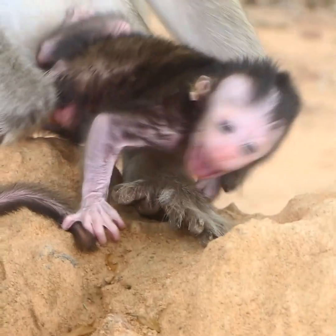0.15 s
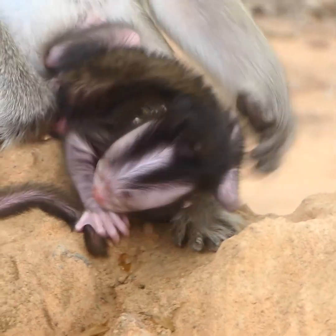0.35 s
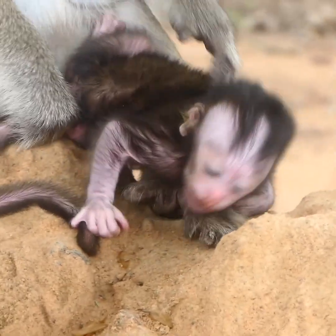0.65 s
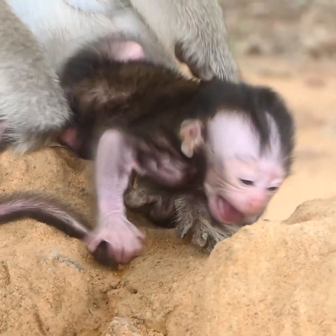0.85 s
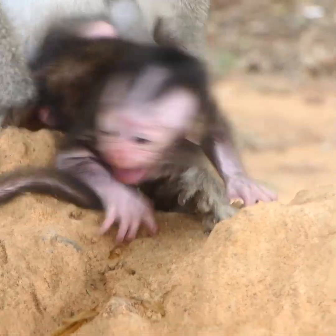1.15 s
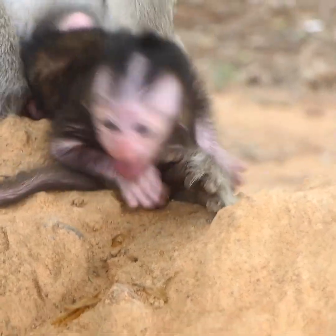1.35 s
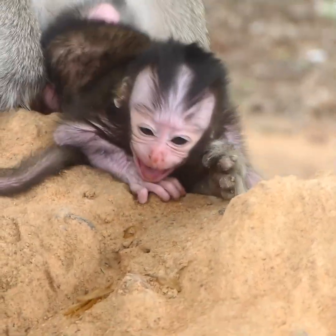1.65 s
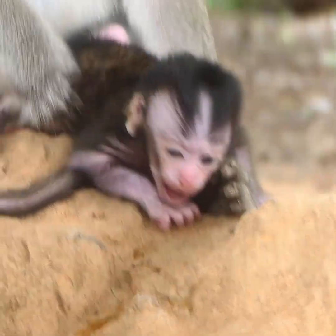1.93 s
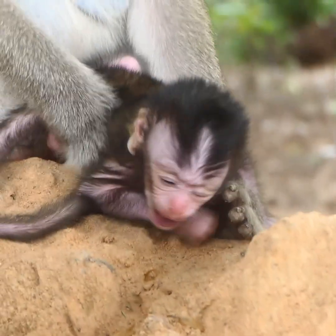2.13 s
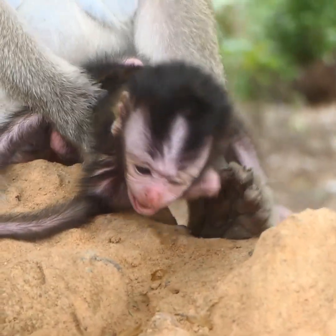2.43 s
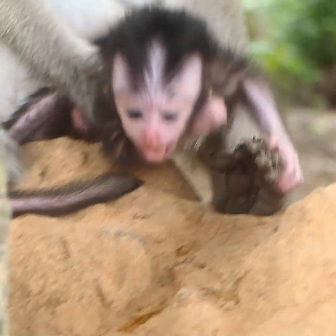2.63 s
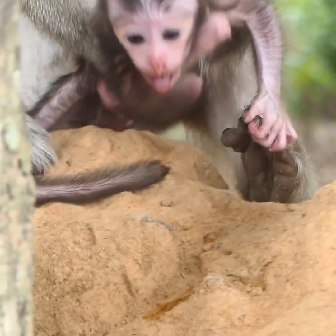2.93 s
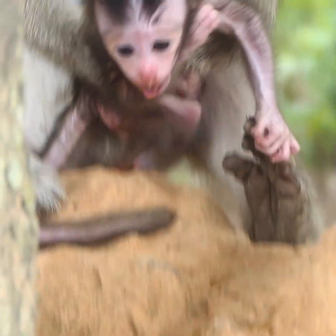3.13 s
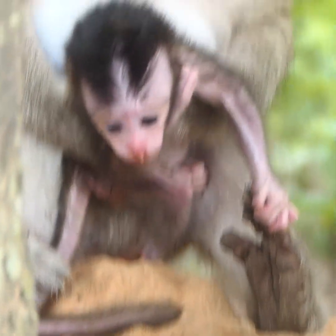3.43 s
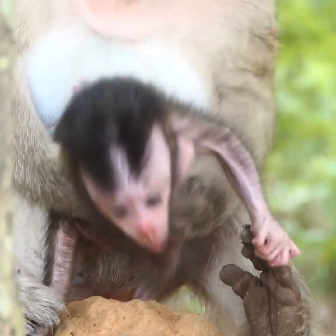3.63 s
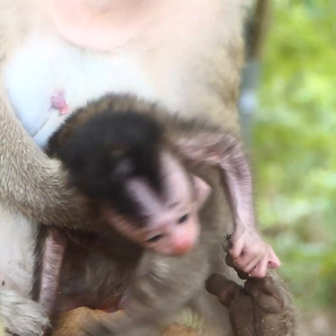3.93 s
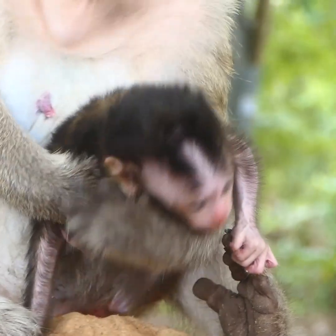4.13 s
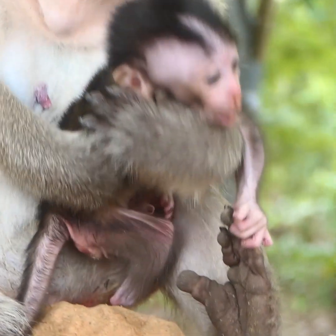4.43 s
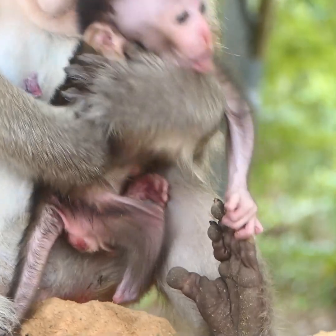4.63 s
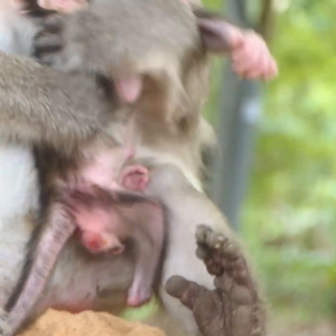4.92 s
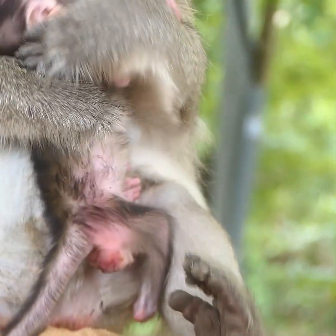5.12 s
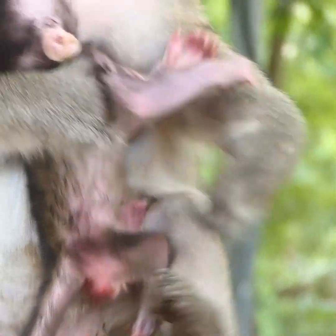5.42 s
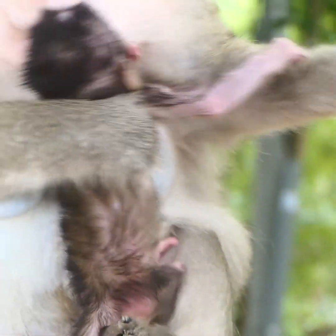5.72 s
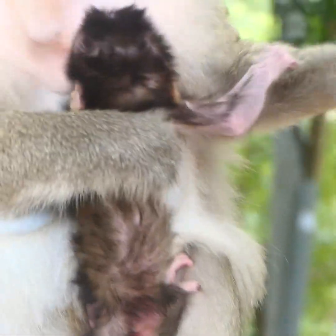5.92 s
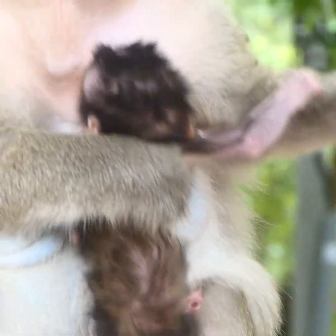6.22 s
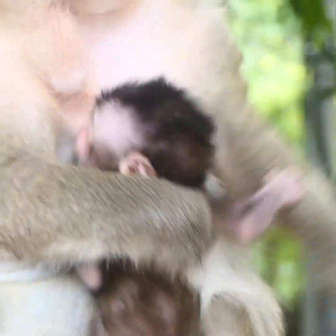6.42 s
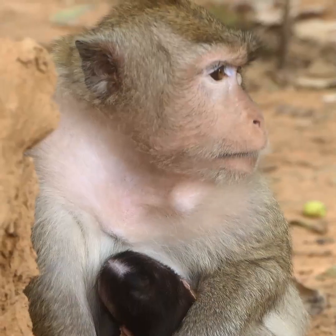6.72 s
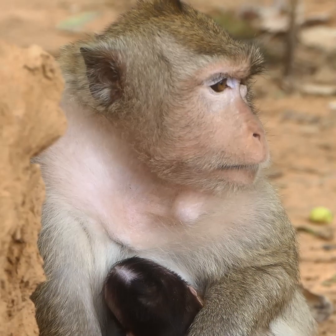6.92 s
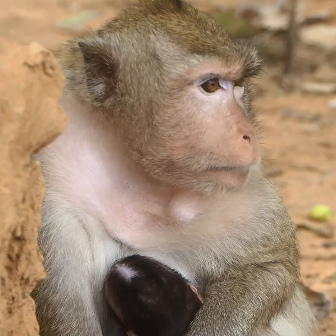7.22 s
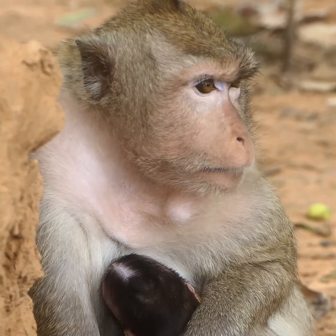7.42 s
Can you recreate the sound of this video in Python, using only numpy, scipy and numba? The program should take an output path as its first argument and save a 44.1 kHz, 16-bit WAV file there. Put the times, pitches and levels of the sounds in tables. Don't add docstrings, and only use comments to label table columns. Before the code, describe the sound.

Shrill infant monkey screams outdoors over a low chugging motorbike, then soft rustles, a tiny gap and a second motorbike drawing away.

```python
import sys
import numpy as np
from scipy import signal
from scipy.fft import rfft, irfft, next_fast_len
from scipy.io import wavfile
from scipy.ndimage import uniform_filter1d
from numba import njit

SR = 44100
rng = np.random.default_rng(int(sys.argv[2]) if len(sys.argv) > 2 else 0)


def wav_record(signal):
    frames = np.transpose(np.atleast_2d(signal))
    bounded = np.clip(frames, -1, 1)
    quanta = np.round(bounded * 32767).astype(np.int16)
    wavfile.write(sys.argv[1], SR, quanta)


def gain_from_db(level_db):
    decades = np.asarray(level_db, float) / 20
    return 10 ** decades


N = 333396
TIME = np.arange(N) / SR
SIDES = np.array([[1], [-1]])
CUT_S = 6.6


def columns(rows, size=150):
    s, *cols = np.transpose(rows)
    return [uniform_filter1d(np.interp(TIME, s, c), size) for c in cols]


def gate(t0, t1, fade):
    return np.clip(np.minimum(TIME - t0, t1 - TIME) / fade, 0, 1)


def bump(s, half):
    return np.exp(-((TIME - s) / half) ** 2)


def bumps(rows):
    return sum(db * bump(s, half) for s, half, db in rows)


def unit(x):
    return x / np.sqrt(np.mean(x ** 2))


def noise():
    return rng.standard_normal(N)


def walk(rate, size=N):
    k = max(int(SR / rate), 1)
    held = np.repeat(rng.standard_normal(size // k + 1), k)
    return unit(uniform_filter1d(uniform_filter1d(held, k), k)[:size])


def colour(x, points, size=8192):
    hz, db = np.transpose(points)
    bins = np.arange(size // 2 + 1) * SR / size
    c = irfft(np.log(gain_from_db(np.interp(np.log(bins + 1), np.log(hz), db))))
    c[1:size // 2] *= 2
    c[size // 2 + 1:] = 0
    return signal.fftconvolve(x, irfft(np.exp(rfft(c))))[:N]


@njit
def svf(x, hz, width):
    y, b, l = np.empty(len(x)), 0., 0.
    for i in range(len(x)):
        g, k = np.tan(np.pi * hz[i] / SR), width / hz[i]
        v = (b + g * (x[i] - l)) / (1 + g * (g + k))
        b, l, y[i] = 2 * v - b, l + 2 * g * v, k * v
    return y


def band(x, hz, width):
    hz = np.clip(hz + np.zeros(len(x)), 20, .45 * SR)
    return unit(svf(svf(x, hz, 1. * width), hz, 1. * width))


def spread(make, side_db):
    return make() + gain_from_db(side_db) * make() * SIDES


def panned(x, rows):
    return x * gain_from_db(columns(rows)[0] / 2 * SIDES)


def voice_curves():
    # (time [s], whistle [Hz], level [dB], chaos [0-1])
    shriek1 = [
        [(0, 5600, -30.5, 0.6), (.017, 6110, -37.5, 0.57), (.03, 6300, -35, 0.33), (.045, 6290, -34, .55),
         (.06, 6470, -32.5, 0.3), (.066, 6450, -32.5, 0.37), (.072, 7298, -33.5, 0.44),
         (.088, 7680, -31.5, 0.17), (.098, 7300, -30, 0.46)],
        [(.11, 7900, -32, 0.17), (.128, 7890, -33, .3), (.142, 7200, -35, 0.65), (.168, 7040, -32, 0.5),
         (.185, 7320, -36.5, 0.62), (.21, 7970, -32.5, .45), (.222, 7580, -35.5, .35), (.232, 8050, -32, 0.4),
         (.26, 7907, -35, 0.59)],
        [(.29, 8340, -34.5, 0.17), (.328, 8000, -29, 0.15), (.34, 7406, -40.5, 0.96), (.375, 7200, -40, 0.7),
         (.405, 6863, -30.5, 0.3), (.428, 6400, -38.5, 0.75), (.44, 5600, -37, 0.7), (.49, 6700, -38, 0.84),
         (.512, 5977, -35, 0.85)],
        [(.52, 5650, -40, 0.17), (.532, 5920, -37, 0.14), (.55, 5630, -40, 0.2), (.575, 5670, -48, 0.2),
         (.72, 5760, -67, .3)],
    ]
    shriek2 = [
        [(.972, 5870, -63, .05), (.982, 6560, -41.5, .05), (.985, 6020, -26, 0.14), (.988, 5720, -43, .05),
         (.993, 5840, -35.5, .05), (.999, 6222, -23, .05), (1.005, 6680, -31.5, 0.2),
         (1.028, 6750, -37.5, 0.36), (1.042, 7500, -36.5, .6)],
        [(1.048, 8075, -34.5, .2), (1.06, 8350, -32, .15), (1.075, 8480, -34, 0.33), (1.095, 8300, -38, 0.53),
         (1.108, 8310, -36.5, 0.15), (1.15, 7930, -26.5, .05), (1.18, 7400, -33, .35), (1.2, 7650, -30, 0.36),
         (1.217, 7040, -29, .12)],
        [(1.225, 7960, -30.5, 0.13), (1.26, 8820, -33.5, 0.38), (1.29, 8570, -41, .95),
         (1.35, 8500, -41.5, .95), (1.395, 8290, -35, 0.89), (1.42, 8330, -33, .4), (1.49, 7725, -34.5, 0.45),
         (1.53, 7350, -36, 0.48), (1.562, 6970, -29.5, .2)],
        [(1.578, 7550, -30, .35), (1.595, 7150, -33, 0.39), (1.61, 7910, -27, 0), (1.635, 7050, -34, 0.29),
         (1.675, 6920, -25.5, 0.21), (1.7, 7050, -26, 0.12), (1.73, 7570, -32.5, 0.05)],
        [(1.741, 7400, -34.5, .15), (1.746, 6950, -26, .1), (1.764, 6530, -24.5, 0.06),
         (1.77, 5700, -31.5, 0.22), (1.779, 5300, -39.5, 0.02), (1.79, 5125, -68.5, 0.06)],
    ]
    squeal_path = [
        [(2.445, 4810, -56, 0.05), (2.458, 4830, -43, 0.05), (2.53, 4880, -47.5, 0.08),
         (2.552, 5120, -35.5, .08), (2.562, 5085, -37.5, 0.06), (2.578, 5095, -31, 0.07),
         (2.6, 5240, -29.5, 0.01), (2.608, 5550, -30.5, 0.13), (2.618, 5290, -30.5, 0.07)],
        [(2.665, 5873, -25.5, 0.05), (2.69, 5895, -29.5, .05), (2.706, 5120, -26.5, .06),
         (2.742, 5070, -30.5, .05), (2.748, 4710, -31.5, 0.21), (2.8, 4398, -34, 0.08),
         (2.833, 4170, -30, 0.11), (2.864, 2751, -35.5, 0.26), (2.882, 2330, -36, 0.15)],
    ]
    return columns(np.vstack(shriek1 + shriek2 + squeal_path), size=60)


def folds():
    hz, level_db, chaos = voice_curves()
    chaos = np.clip(chaos, 0, 1)
    scatter_hz = chaos * (700 * walk(2500) + 130 * walk(250))
    return hz, level_db, chaos, 2 * np.pi * np.cumsum(hz + scatter_hz) / SR


def flutter(depth_db, rate):
    return gain_from_db(-depth_db * np.maximum(walk(rate), 0) ** 2)


def crackle(size=N):
    return rng.standard_normal(size) * gain_from_db(3.5 * walk(2500, size=size) + walk(150, size=size))


def ring(modes, patchy_db=2.5, size=2 * SR):
    total = 0
    for hz, width, db in modes:
        level = gain_from_db((db + np.zeros(N))[:size] + patchy_db * walk(29.67, size=size))
        moving_hz = hz * (1 + 0.032 * walk(14, size=size))
        total = total + level * band(crackle(size=size), moving_hz, width)
    return np.pad(unit(total), (0, N - size))


def smear(hz):
    modes = []
    for f in np.arange(5700, 9600, 650):
        fall_db = np.maximum(-6.5 * np.abs(f - hz + 300) / 1000, -13)
        modes.append((f, 520, fall_db - 3.6 * (f > 8800)))
    return ring(modes, patchy_db=-0.2)


def rasp_levels(level_db, chaos):
    # (start [s], low throat [dB], mid throat [dB], mouth [dB])
    posture = [(0, -47.5, -42, -44), (.065, -48.5, -44, -50), (.135, -49, -47.5, -49),
               (.215, -46, -58, -38), (.3, -46.5, -49, -42.5), (.335, -48.5, -46.5, -39.5),
               (.39, -48, -44.5, -46.5), (0.516, -48, -61.5, -62), (1.0, -44.5, -45, -43.5),
               (1.05, -51.5, -51.5, -41.5), (1.16, -47.5, -47, -40), (1.245, -45, -44, -36),
               (1.378, -44, -40.5, -44), (1.46, -48.5, -40.5, -44.5), (1.53, -55, -57.5, -43),
               (1.6, -53, -61.5, -48.5)]
    starts, *levels = np.transpose(posture)
    now = np.clip(np.searchsorted(starts, TIME, side="right") - 1, 0, None)
    held = uniform_filter1d(np.array(levels)[:, now], 1200, axis=1)
    growth_db = np.array([[12], [13], [10]]) * np.log10(np.clip(chaos, .01, 1))
    return held + growth_db + np.minimum(level_db + 37.5, 0)


def shrieks(hz, high_db, chaos, phase):
    # (centre [Hz], width [Hz], level [dB])
    low_throat = [(2883, 420, 7.5), (3320, 820, -0.5)]
    mid_throat = [(4330, 1900, 3), (3860, 690, -0.5)]
    mouth = [(5216, 260, -4.5), (5600, 2400, -2.5)]
    # (time [s], half length [s], loss [dB])
    gulps = [(.057, .002, 7), (0.202, .003, 5), (0.29, .004, 3.5), (.414, .003, 8.5), (1.03, .003, 6),
             (1.104, .005, 5), (1.212, .002, 5), (1.233, .002, 5.5), (1.558, .003, 6), (1.569, .003, 7.5),
             (1.593, .004, 7.5), (1.613, .003, 8.5), (1.633, .004, 5.5), (1.684, .002, 6), (1.697, .003, 7),
             (1.714, .002, 8), (1.721, .003, 6)]
    low_db, mid_db, mouth_db = rasp_levels(high_db, chaos)
    tone = np.sqrt(2) * np.sin(phase) * gain_from_db(1.0 * walk(130)) * flutter(0.74 + 2.6 * chaos, 260)
    share = np.clip(0.0053 + 1.7 * chaos ** 1.67, 0, 1)
    high = np.sqrt(1 - share) * tone + np.sqrt(share) * smear(hz)
    voice = gain_from_db(high_db) * high + gain_from_db(low_db) * ring(low_throat)
    voice = voice + gain_from_db(mid_db) * ring(mid_throat, patchy_db=0.2)
    voice = voice + gain_from_db(mouth_db) * ring(mouth, patchy_db=4.0)
    return voice * gain_from_db(-bumps(gulps)) * (gate(-1, 0.57, 0.15) + gate(0.93, 1.79, .006))


def grove(voice):
    tails = rng.standard_normal((2, SR // 2)) * gain_from_db(-60 * TIME[:SR // 2] / 0.47)
    return signal.fftconvolve(voice[None], tails, axes=1)[:, :N] * gain_from_db(-45.0)


def rustles():
    # (time [s], length [s], centre [Hz], width [Hz], level [dB])
    puffs = [(0, 0.091, 8150, 500, -41), (0.12, 0.03, 7000, 500, -40), (0.202, 0.037, 6240, 400, -35.5),
             (0.324, .05, 5560, 700, -38), (0.428, 0.031, 5600, 400, -41), (.9495, .018, 2800, 1503, -43.5),
             (.9496, 0.0089, 6300, 1800, -47), (.954, 0.0098, 3690, 700, -50),
             (.996, 0.039, 8730, 400, -44.5), (.998, 0.064, 5900, 350, -40), (1.195, .04, 5230, 130, -39.5),
             (1.252, .07, 5940, 900, -42.5), (1.299, 0.079, 5310, 150, -45), (1.35, .12, 4280, 500, -41),
             (1.356, 0.073, 5900, 900, -43), (1.429, 0.1, 4200, 800, -42), (1.529, .04, 5250, 120, -40),
             (1.62, 0.043, 5210, 150, -45), (1.63, 0.07, 2600, 500, -52.5),
             (2.698, 0.056, 8860, 400, -50.5), (2.719, .025, 7600, 150, -50),
             (2.742, 0.025, 4300, 1800, -39), (2.781, 0.026, 4300, 1800, -41),
             (2.793, .05, 6500, 150, -48.5), (2.845, .025, 6400, 500, -40), (5.316, .11, 1440, 430, -36.5),
             (5.32, 0.073, 880, 290, -46.5), (5.326, 0.072, 6070, 700, -54),
             (5.338, 0.068, 2750, 200, -48.5), (5.436, 0.16, 3700, 1500, -51), (5.49, 0.13, 3470, 90, -54),
             (5.54, 0.06, 3100, 1400, -45.5), (5.541, 0.051, 6100, 600, -54),
             (5.547, 0.059, 1300, 800, -46), (5.578, 0.031, 3460, 150, -52), (5.666, .025, 3500, 150, -46),
             (7.4, .02, 3403, 710, -50)]
    # (start [s], end [s], from [Hz], to [Hz],
    # level [dB])
    squeak = (.959, 0.76, 5900, 9400, -50)
    out = np.zeros((2, N))
    t = TIME[:SR // 8]
    for s, length, hz, width, db in puffs:
        start = int(s * SR)
        swell = np.sin(np.pi * np.clip(t / length, 0, 1) ** 0.814) ** 1.5
        lump = spread(lambda: band(rng.standard_normal(len(t)), hz, width), -12.5)
        out[:, start:start + len(t)] += gain_from_db(db) * swell * lump
    t0, t1, from_hz, to_hz, db = squeak
    glide = np.sin(2 * np.pi * np.cumsum(np.interp(TIME, [t0, t1], [from_hz, to_hz])) / SR)
    return out + gain_from_db(db) * gate(t0, t1, 0.0026) * flutter(5.7, 400) * glide


def engine(hz, start, exhaust, scatter_db):
    turns = start + np.cumsum(hz * (1 + .003 * walk(25))) / SR
    pulses = np.diff(np.floor(turns), prepend=np.floor(start)) * gain_from_db(scatter_db * walk(30))
    echoes = rng.standard_normal(SR // 8) * gain_from_db(-38.5 - 60 * TIME[:SR // 8] / 0.34)
    echoes[0] = 1
    return unit(colour(signal.fftconvolve(pulses, echoes)[:N], exhaust)), turns


def roar(points, cycle, gating):
    # (frequency [Hz], left-right correlation [0-1])
    likeness = [(30, 0.95), (70, 0.79), (250, 0.78), (600, 0.58), (1400, 0.63), (3000, 0.86), (9000, 0.3)]
    side = [(f, 10 * np.log10((1 - np.clip(c, 0, .99)) / (1 + c))) for f, c in likeness]
    puff = (1 + gating * np.exp(-cycle / 0.22)) * gain_from_db(0.35 * walk(9))
    mid = colour(noise() * puff, points)
    both = mid + colour(colour(noise() * puff, points), side) * SIDES
    return both / np.sqrt(np.mean(mid ** 2))


def drive_by():
    # (level when nearest [dB], share of the 1 / distance law, gain once the tail pipe faces us [dB])
    bike_layers = [
        (-48.5, .9, -2),
        (-45, 0.31, 2.5),
        (-50, 0.86, -1.5),
        (-55, 0.6, -2.5),
        (-54, 0.5, -1),
    ]
    # (time [s], half length [s], centre [Hz], lift [dB])
    booms = [
        (2.299, 0.35, 779, 6),
        (3.15, 0.23, 877, 13.5),
        (3.656, 0.16, 685.7, 7.5),
        (4.47, 0.55, 734, 15),
    ]
    # (time [s], half length [s], lift [dB])
    throttle = [
        (0.748, 0.2, 1),
        (2.447, 0.2, 5),
        (3.735, 0.36, 6.5),
        (4.6, 0.098, 1),
    ]
    throttle_shares = (0.24, 0.48, 1, .2, 0.12)
    firing_hz, speed_m_s, passes_s, kerb_m, boom_rest_hz = 24.38, 16.5, 3.78, 15.5, 780
    along = speed_m_s * (TIME - passes_s)
    distance = np.hypot(along, kerb_m)
    surge_db = bumps(throttle)
    levels = []
    for (db, law, rear_db), answer in zip(bike_layers, throttle_shares):
        distance_db = law * 20 * np.log10(kerb_m / distance)
        levels.append(db + distance_db + rear_db * along / distance + answer * surge_db)
    boom_db = sum(db * bump(s, half) for s, half, hz, db in booms)
    levels[3] = levels[3] + boom_db
    levels[4] = levels[4] + 0.15 * boom_db
    boom_hz = boom_rest_hz + sum((hz - boom_rest_hz) * bump(s, half) for s, half, hz, db in booms)
    return firing_hz * (1 - speed_m_s / 343 * along / distance), levels, boom_hz


def lifted(thump):
    # (time [s], half length [s], centre [Hz], width [Hz], level [dB])
    lifts = [(0.301, 0.65, 120, 142, -4), (2.15, 0.31, 131, 140, -4.5), (2.306, 0.41, 202.6, 49.8, -8.5),
             (3.65, 0.36, 150, 30.09, -7), (3.9, 0.49, 211.1, 39.6, -5), (3.75, 0.18, 500, 200, -13),
             (4.2, 0.14, 121, 25.1, -9.5), (4.7, 0.16, 96, 25, -18), (5.05, 0.13, 230, 50.3, -13.5),
             (5.3, .15, 94, 40, -6), (5.65, 0.23, 141, 25, -10.5), (6.098, .2, 169.3, 40, -14),
             (6.435, 0.1, 119.6, 30, -8.5)]
    out = gain_from_db(-3.0) * thump
    for s, half, hz, width, db in lifts:
        pick = signal.butter(1, [hz - width / 2, hz + width / 2], "band", fs=SR, output="sos")
        out = out + gain_from_db(db) * bump(s, half) * unit(signal.sosfilt(pick, thump))
    return out


def passing_bike():
    # (frequency [Hz], level [dB])
    exhaust_shape = [(25, -34.5), (50, -24.5), (72, -1), (125, 5.5), (200, -5), (260, -19.5), (400, -21),
                     (700, -23), (2000, -64.5), (6000, -84.5)]
    # (frequency [Hz], level [dB per Hz])
    road_shape = [(35, -36.5), (60, -12), (128, -5), (305, -15), (480, -14), (740, -16.5), (1260, -17),
                  (3460, -21.5), (5990, -27.5), (9330, -47.5), (12000, -72)]
    # (centre [Hz], width [Hz], level [dB])
    frame_modes = [(385.6, 50, 2), (447.3, 53, 3), (534, 65, -7)]
    hz, (deep_db, exhaust_db, frame_db, boom_db, road_db), boom_hz = drive_by()
    thump, turns = engine(hz, 0.304, exhaust_shape, 0.65)
    deep = np.sqrt(2) * np.sin(4 * np.pi * turns + .2 * SIDES)
    turn_db = -3 * np.tanh((TIME - 3.2) / 0.31) * (1 - gate(3.56, 9, 0.35) * .6)
    shaken = noise() + 0.087 * unit(np.gradient(thump))
    frame = gain_from_db(-12.5) * band(noise(), 450, 250) * SIDES
    for f, width, db in frame_modes:
        level = gain_from_db(db + turn_db * (f - 430) / 50 + 2.6 * walk(2.987))
        frame = frame + level * band(shaken, f * (1 + 0.015 * walk(1.5)), width)
    boom = spread(lambda: band(noise(), boom_hz, 340), -9.5) * gain_from_db(2.0 * walk(8))
    engine_note = gain_from_db(deep_db + 1.7) * deep + gain_from_db(exhaust_db + 1.0) * lifted(thump)
    body = gain_from_db(frame_db - 4.0) * frame + gain_from_db(boom_db - 2.0) * boom
    return engine_note + body + gain_from_db(road_db + 11.5) * roar(road_shape, turns % 1, 0.25)


def lagged(x):
    upper = signal.sosfilt(signal.butter(1, 350, "high", fs=SR, output="sos"), x.mean(axis=0))
    size = next_fast_len(N)
    quarter_turn = irfft(1j * rfft(upper, size), size)[:N]
    return x + gain_from_db(-17.5) * quarter_turn * SIDES


def squeal(hz, level_db, chaos, phase):
    # (time [s], step [Hz], coupling into the tone above [dB], into the tone below [dB])
    second = [(2.605, 1100, -14.5, -20.5), (2.625, 1303, -11.5, -15), (2.65, 1490, -16, -12.5),
              (2.685, 1620, -20, -13.5), (2.712, 1747, -30, -18.5), (2.73, 1299, -28.5, -15.5),
              (2.75, 996, -13, -3), (2.763, 980, -7.5, -3.5), (2.768, 1116, -10, -4), (2.78, 1116, -3, -7),
              (2.81, 1073, -9, -9.5), (2.845, 599.6, -18.5, -11)]
    # (time [s], half length [s], loss [dB])
    catches = [(2.557, .002, 9.5), (2.602, .002, 13), (2.613, 0.0018, 9.5), (2.622, 0.0047, 4.5),
               (2.646, 0.001, 9), (2.675, .004, 7), (2.695, .002, 10), (2.702, 0.0014, 9.5),
               (2.712, .002, 4.5), (2.723, .002, 4), (2.743, .003, 8), (2.8, .003, 5.5), (2.836, 0.0036, 5)]
    step_hz, over_db, under_db = columns(second)
    onset_db = 32 * (gate(2.592, 2.86, 0.016) - 1)
    under_db, over_db, far_db = under_db + onset_db, over_db + onset_db, -23 + onset_db
    step = 2 * np.pi * np.cumsum(step_hz + 45 * walk(500)) / SR
    second_under = gain_from_db(-12.0 - 3 * gate(2.7, 3, .03)) * np.sin(phase - 2 * step)
    under = gain_from_db(under_db) * flutter(2.8, 500) * (np.sin(phase - step) + second_under)
    over = gain_from_db(over_db + 0.5) * flutter(1.8, 160) * np.sin(phase + step)
    over = over + gain_from_db(far_db) * flutter(5.4, 90) * np.sin(phase + 2 * step)
    slow_depth_db = 2.1 * gate(2.52, 2.82, 0.052) - 1.5 * gate(2.4, 4.0, .01)
    unsteady = gain_from_db(0.91 * walk(130)) * flutter(slow_depth_db, 230)
    unsteady = unsteady * flutter(7.0 * gate(2.742, 3.3, .01), 600)
    tone = unsteady * np.sin(phase) * gain_from_db(-bumps(catches))
    tones = (tone + under + over) / np.sqrt(0.4 + gain_from_db(2 * under_db) / 2 + gain_from_db(2 * over_db) / 2)
    rasp = gain_from_db(-17.5 + 19 * chaos) * band(crackle(), hz + 1500, 6000) * gate(2.556, 2.93, 0.1)
    return gain_from_db(level_db) * (tones + rasp) * gate(2.445, 2.89, 0.0076)


def ducking(calls):
    keep = np.exp(-1 / (0.4 * SR))
    loud = signal.lfilter([1 - keep], [1, -keep], calls ** 2, zi=[gain_from_db(2 * -36)])[0]
    return (1 + uniform_filter1d(loud, 3000, origin=1400) / gain_from_db(2 * -41)) ** (-.8 / 2)


def starved(x):
    under_db, chance, hole_db = -24, .22, -25
    hz, _, z = signal.stft(x, SR, nperseg=1024)
    power = uniform_filter1d(np.abs(z[0] + z[1]) ** 2, 3, axis=1)
    weak = (power < gain_from_db(2 * under_db) * power[hz > 2000].max(axis=0)) & (hz[:, None] > 2000)
    draws = rng.random((len(hz), power.shape[1] // 9 + 2)) < chance
    turn = (np.arange(power.shape[1]) + rng.integers(0, 9, (len(hz), 1))) // 9
    dropped = np.repeat(np.take_along_axis(draws, turn, axis=1), 2, axis=0)[:len(hz)]
    return signal.istft(z * np.where(weak & dropped, gain_from_db(hole_db), 1), SR, nperseg=1024)[1][:, :N]


def first_shot():
    # (time [s], left minus right [dB])
    heading = [
        (0, 0),
        (.5, -.7),
        (1, -0.5),
        (1.5, 1.5),
        (1.8, -2),
        (2.5, 1),
        (2.9, -1),
    ]
    # (time [s], left minus right [dB])
    bearing = [
        (0, 2.5),
        (2.2, 3.1),
        (3.3, 2.5),
        (4.1, -1),
        (4.8, -1.4),
        (6.5, -0.8),
    ]
    whistle = folds()
    calls = shrieks(*whistle) + squeal(*whistle)
    aside = gain_from_db(-15.0) * (np.roll(calls, 41) + np.roll(calls, 131)) * SIDES
    cries = panned(calls, heading) + aside + grove(calls)
    sound = cries + rustles() + ducking(calls) * panned(lagged(passing_bike()), bearing)
    limited = .085 * np.tanh(sound / .085)
    narrow = signal.ellip(10, .2, 80, 9350, fs=SR, output="sos")
    return signal.sosfilt(narrow, starved(limited)) * gate(-1, CUT_S, 0.00047)


def cut_hiss():
    tick = .12 * gate(-1, 0.0037, .003)
    burst = np.clip((TIME - CUT_S + .004) / .011, 0, 1) * gate(-1, CUT_S + 0.011, .002)
    return spread(noise, 1.86) * gain_from_db(-50) * (burst + tick)


def leaving_bike():
    # (frequency [Hz], level [dB])
    exhaust_shape = [(30, -32.5), (60, -19), (120, -8), (180, 4), (240, -13), (275, 0), (350, -8.5),
                     (500, -23.5), (1200, -41), (3000, -50), (8000, -86)]
    # (frequency [Hz], level [dB per Hz])
    road_shape = [(35, -63), (60, -21), (106, -9), (180, -12.5), (300, -12), (456, -24), (900, -17),
                  (1230, -15.5), (1550, -23), (3320, -23), (4950, -30.5), (9330, -35), (11500, -39),
                  (15000, -56)]
    restart_s, firing_hz = 6.874, 30.24
    thump, turns = engine(firing_hz + np.zeros(N), .26, exhaust_shape, 0.95)
    exhaust_db = -38.5 - 13.5 * (TIME - restart_s)
    road_db = -41 - 8 * (TIME - restart_s)
    bike = gain_from_db(exhaust_db + 2.0) * thump + gain_from_db(road_db + 3.5) * roar(road_shape, turns % 1, 0.17)
    leaves = gain_from_db(-65.5) * spread(lambda: band(noise(), 7500, 6500), -8)
    return (bike + leaves) * gate(restart_s - .001, 7.562, 0.00033)


def scene():
    return first_shot() + cut_hiss() + leaving_bike()


def low_pass(x):
    return signal.sosfilt(signal.butter(12, 15300, fs=SR, output="sos"), x)


def record(dry):
    bass_cut = signal.butter(2, 30, "high", fs=SR, output="sos")
    return low_pass(signal.sosfilt(bass_cut, dry))


dry = scene()
out = record(dry)
wav_record(out)
```